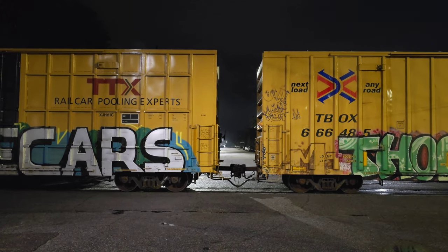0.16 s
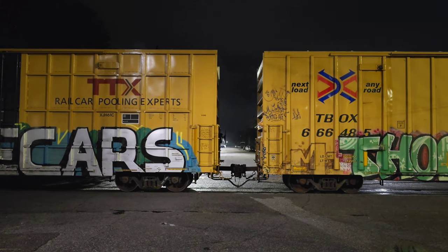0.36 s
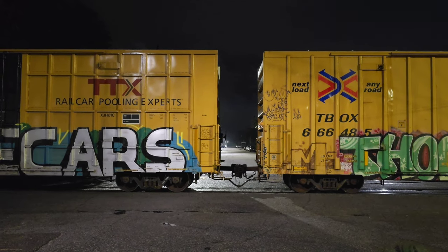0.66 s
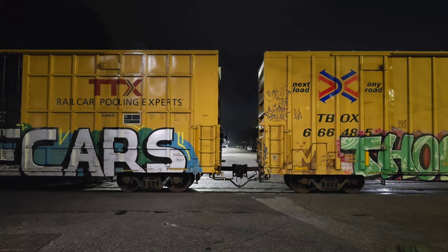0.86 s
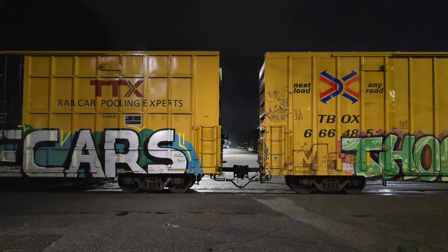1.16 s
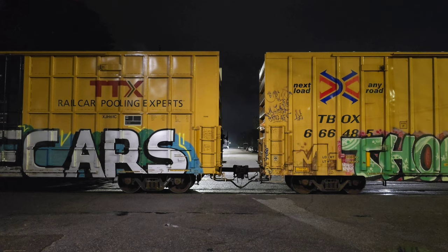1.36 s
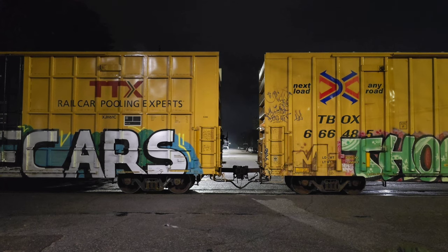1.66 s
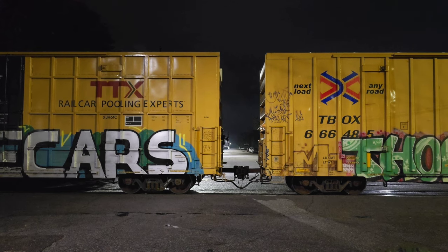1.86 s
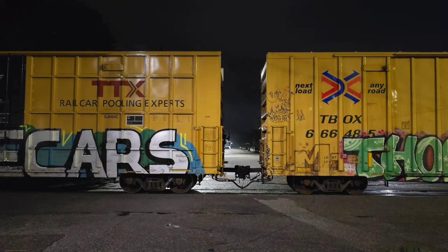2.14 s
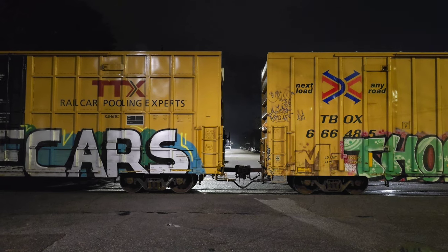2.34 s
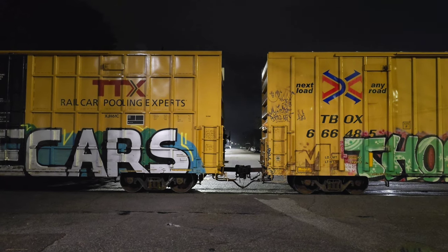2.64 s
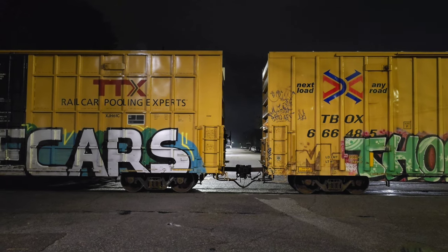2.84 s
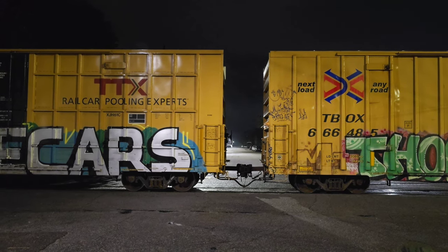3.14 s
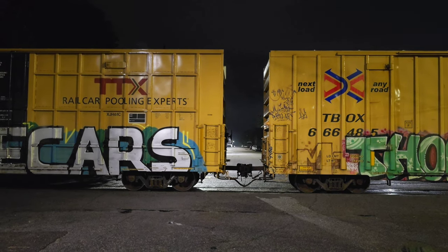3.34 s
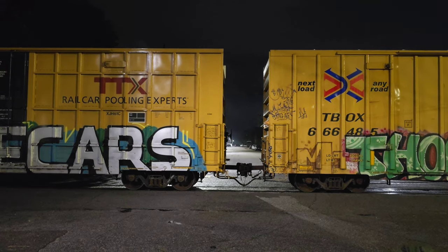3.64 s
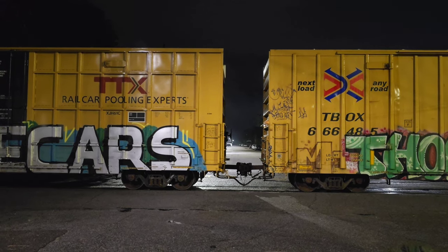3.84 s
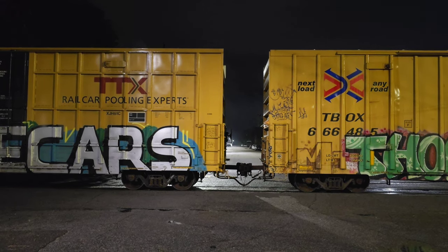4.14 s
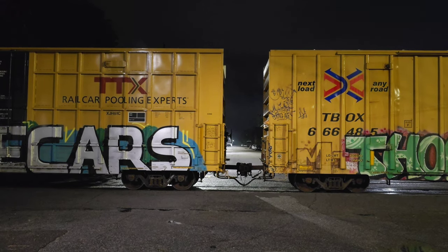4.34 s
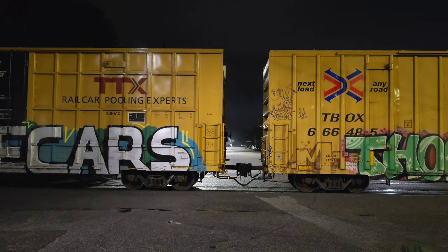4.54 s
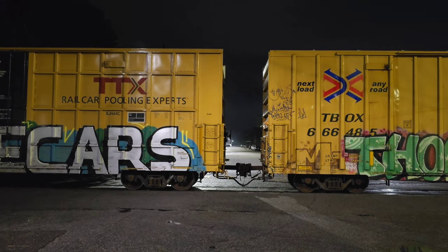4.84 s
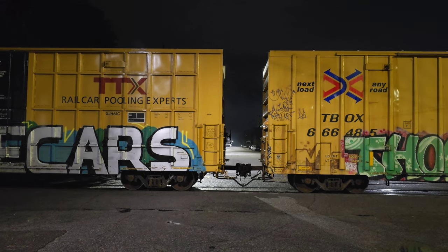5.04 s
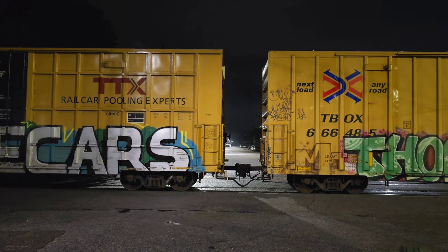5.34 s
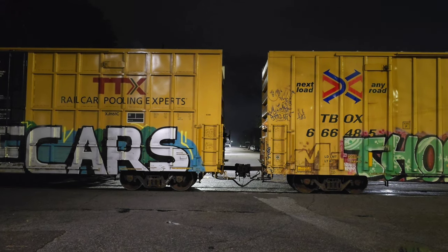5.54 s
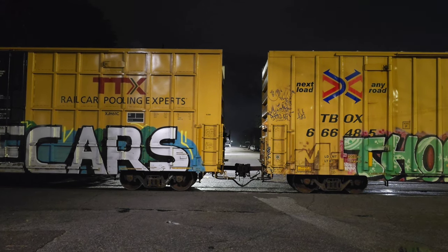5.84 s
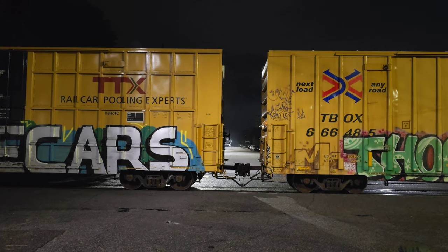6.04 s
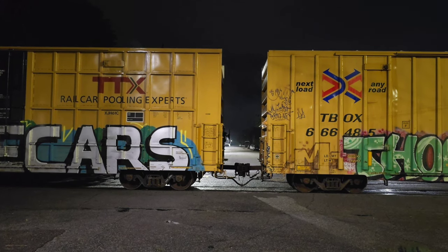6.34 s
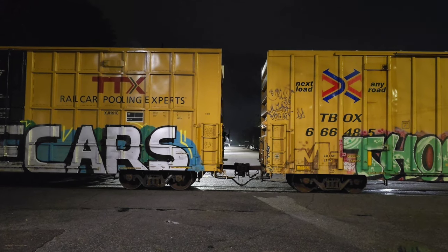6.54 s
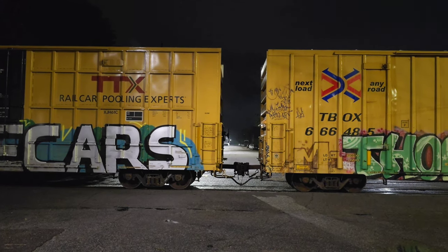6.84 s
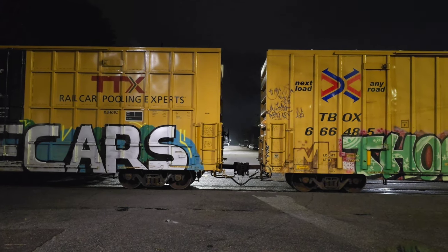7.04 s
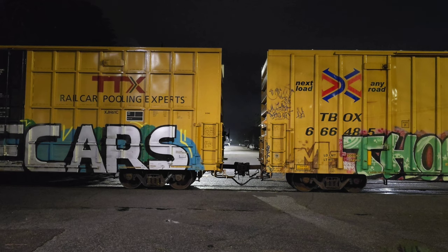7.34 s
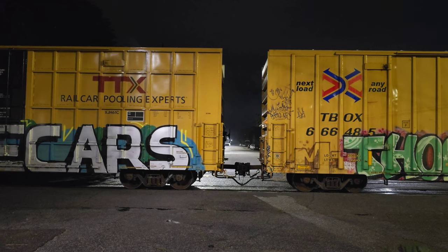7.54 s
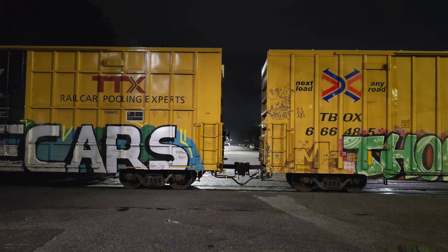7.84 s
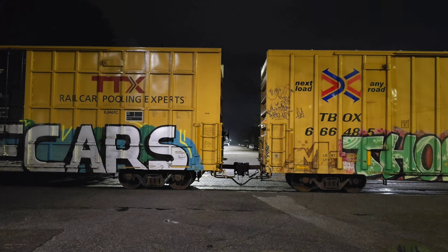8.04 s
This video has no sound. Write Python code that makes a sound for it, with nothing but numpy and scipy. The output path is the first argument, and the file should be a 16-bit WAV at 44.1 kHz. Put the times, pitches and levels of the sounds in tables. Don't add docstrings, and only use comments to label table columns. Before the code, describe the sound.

Sharp metal clank, then deep hollow freight car thuds rolling off into the distance, over engine rumble and air hiss, with brief high brake chirps.

```python
import sys
import numpy as np
from scipy import signal
from scipy.fft import rfft, irfft, next_fast_len
from scipy.io import wavfile
from scipy.ndimage import uniform_filter1d, map_coordinates

SR = 44100
rng = np.random.default_rng(int(sys.argv[2]) if len(sys.argv) > 2 else 0)


def to_linear_factor(level_db):
    exponent = np.asarray(level_db, float) / 20
    return 10 ** exponent


def to_wav(s):
    ch = np.atleast_2d(s).T
    pcm = np.round(np.clip(ch, -1, 1) * 32767)
    wavfile.write(sys.argv[1], SR, pcm.astype(np.int16))


N = 361090
T = np.arange(N) / SR


def unit(x):
    return x / np.sqrt(np.mean(x ** 2) + 1e-20)


def along(points, hz):
    f, v = np.transpose(points)
    return np.interp(np.log(hz + 1), np.log(f + 1), v)


def curve(rows):
    s, value = np.transpose(rows)
    return np.interp(T, s, value)


def wobble(rate, size=N):
    knots = rng.standard_normal(int(size * rate / SR) + 4)
    return map_coordinates(knots, [np.arange(size) * rate / SR])


def filtered(x, response):
    m = next_fast_len(x.shape[-1] + 4096)
    return irfft(rfft(x, m) * response(np.fft.rfftfreq(m, 1 / SR)), m)[..., :x.shape[-1]]


def placed(x, lag):
    # frequency in Hz, level the left loses in dB per sample of lag.
    shadow = [(600, 0), (1500, -.1), (3000, 0.18), (5000, 0.314), (8000, 0.68), (15000, 0.1)]
    port = np.array([[1], [-1]])

    def response(hz):
        loss_db = port * lag * along(shadow, hz) / 2
        return to_linear_factor(-loss_db) * np.exp(-1j * np.pi * port * hz * lag / SR)

    return filtered(x, response)


def diffuse(pair):
    ports_m, sound_m_per_s = 0.22, 343

    def mid_side(hz):
        angle = np.arccos(.97 * np.sinc(2 * hz * ports_m / sound_m_per_s)) / 2
        return np.array([np.cos(angle), np.sin(angle)])

    mid, side = filtered(pair, mid_side)
    return np.array([mid + side, mid - side])


def rush(spectrum, patchy_db, channels=2):
    z = signal.stft(rng.standard_normal((channels, N)), nperseg=512)[2]
    field = uniform_filter1d(rng.standard_normal(z.shape[1:]), size=6, axis=0)
    field = uniform_filter1d(field, size=14, axis=1)
    noise = signal.istft(z * to_linear_factor(patchy_db * unit(field)), nperseg=512)[1][:, :N]
    closed = [(spectrum[0][0] * .7, -120)] + list(spectrum) + [(16500, -120)]
    return unit(filtered(noise, lambda hz: to_linear_factor(along(closed, hz))))


def dying(events, rise_s, fall_db_per_s):
    after = [(np.maximum(T - s, 0), db) for s, db in events]
    return sum(to_linear_factor(db - fall_db_per_s * t) * (1 - np.exp(-t / rise_s)) for t, db in after)


def sung(rows, waver_hz, flutter_db, octave_db):
    s, hz, db = np.transpose(rows)
    span = (T > s[0]) & (T < s[-1])
    t, out = T[span], np.zeros(N)
    pitch_hz = np.interp(t, s, hz) + waver_hz * wobble(117.3, size=len(t))
    phase = 2 * np.pi * np.cumsum(pitch_hz) / SR
    edge = np.clip(np.minimum(t - s[0], s[-1] - t) / 0.0034, 0, 1)
    level = edge * to_linear_factor(np.interp(t, s, db) + 8.0 + flutter_db * wobble(82.7, size=len(t)))
    octave = to_linear_factor(octave_db) * wobble(336, size=len(t)) * np.sin(2 * phase)
    out[span] = level * (np.sin(phase) + octave)
    return out


def blows(table, spread, clear, clear_db, t60_s, rise_s, longest_s):
    clump_hz, clump_db = 110, 2
    out, t = np.zeros((2, N + SR)), np.arange(SR // 2) / SR
    hz, level_db, life_s = np.transpose(clear)[:, :, None]
    decay = to_linear_factor(level_db - 60 * t / np.minimum(life_s, longest_s))
    modes = (decay * np.sin(2 * np.pi * hz * t)).sum(axis=0)
    clumps = clump_db * rng.standard_normal(round(SR / 2 / clump_hz) + 2)

    def crowd_gain(f):
        return to_linear_factor(along(spread, f) + map_coordinates(clumps, [f / clump_hz]))

    for s, db, length_s, lag, tilt_db in table:
        contacts = rng.standard_normal(len(t)) * (rng.random(len(t)) < .05)
        force = contacts * (1 - np.exp(-t / rise_s)) * np.exp(-(t / length_s) ** 2)
        energy = np.abs(signal.fftconvolve(force ** 2, to_linear_factor(-120 * t / t60_s))[:len(t)])
        crowd = np.sqrt(energy) * filtered(rng.standard_normal(len(t)), crowd_gain)
        ring = unit(crowd) + to_linear_factor(clear_db) * unit(signal.fftconvolve(force, modes)[:len(t)])
        ring = filtered(ring, lambda f: to_linear_factor(tilt_db * np.log2(f / 1800 + 0.072)))
        ring = ring / np.sqrt(np.mean(ring[:round(SR * (length_s + .03))] ** 2))
        out[:, round(s * SR):][:, :len(t)] += to_linear_factor(db) * placed(ring, lag)
    return out[:, :N]


def coupler_clank():
    # start in seconds, level in dB, rattle length in seconds, left lag in samples,
    # brightness in dB per octave.
    contacts = [
        (0.0, -42, 0.0075, -27.5, -7),
        (.225, -46, 0.026, -29, -7.5),
        (.318, -45, 0.05, -25, -4),
        (.341, -23, 0.03, -25.5, -1.5),
        (1.0, -46, 0.019, -17.5, -6),
        (.359, -29, 0.0075, -19, -2),
        (.385, -28.5, 0.0087, -23.5, 0),
        (1.345, -46, .04, -26, -14),
    ]
    # frequency in Hz, density in dB per Hz.
    knuckle = [(100, -33), (170, 6.5), (300, -1.5), (500, -5), (900, -3.5), (1400, -2.5), (1800, 1.5),
               (2500, -1), (3500, -4), (5000, -8.5), (7500, -15.5), (10000, -21.5), (12500, -12),
               (14500, -49)]
    # frequency in Hz, level in dB, t60 in seconds.
    steel = [(1616, 0, .2), (1691, -1, .2), (1745, -1, .2), (1979, -3, .2), (2126, -5, .2), (2315, -5, .2),
             (3343, -8, .2), (3700, -11, .2), (4802, -9, .15), (5146, -10, .2), (5812, -5, .2),
             (7607, -6, .2), (8028, -11, .15), (8888, -11, .1), (10870, -17, .1), (11890, -11, .15),
             (12505, -18, .2)]
    return blows(contacts, knuckle, steel, clear_db=-3.5, t60_s=.16, rise_s=.004, longest_s=.18)


def boxcar_blows():
    # start in seconds, level in dB, rattle length in seconds, left lag in samples,
    # brightness in dB per octave.
    hits = [
        (1.055, -40.5, 0.083, 16.5, -0.5),
        (1.112, -28, 0.023, 19, 2.5),
        (1.21, -35, 0.025, 19.6, 1),
    ]
    # frequency in Hz, density in dB per Hz.
    panels = [(60, -37), (110, -3), (230, 6), (320, -22.5), (600, -6), (900, -17.5), (1500, -19.5),
              (2500, -29.5), (4000, -29.5), (6000, -37), (7800, -36), (8800, -46), (14000, -59)]
    # frequency in Hz, level in dB, t60 in seconds.
    bolts = [(113, 0, .3), (610, -15, .09), (830, -14, .1), (3800, -20, .06), (4700, -24, .04),
             (6300, -27, .05), (7400, -28, .05)]
    return blows(hits, panels, bolts, clear_db=-4, t60_s=0.18, rise_s=.005, longest_s=0.63)


def drum(f):
    # frequency in Hz, width in Hz, level in dB.
    cavity = [(112.3, 16, -8), (175, 58, -6.5), (224.6, 32.3, 0), (383, 270, -17), (580, 570, -20)]
    modes = 0
    for k, (hz, width_hz, db) in enumerate(cavity):
        damping = 1j * f * width_hz
        modes = modes + (-1) ** k * to_linear_factor(db) * damping / (hz * hz - f * f + damping)
    return modes / (1 + 1j * f / 600) ** 2


def car_thuds():
    # start in seconds, peak level in dB.
    pushes = [(1.119, -4.5), (1.179, -11), (1.241, -8), (1.304, -17), (1.379, -32), (1.421, -15),
              (1.454, -37), (1.529, -18), (1.637, -16), (1.66, -11), (1.734, -16), (1.788, -39),
              (1.908, -26), (1.952, -35)]
    impulses = np.zeros(N)
    for s, db in pushes:
        impulses[round(s * SR)] = to_linear_factor(db + 36)
    return placed(filtered(impulses, drum), 22)


def singing_wall():
    # start in seconds, length in seconds, level in dB.
    struck = [
        (1.11, 0.15, -30),
        (1.24, 0.064, -29),
    ]
    wall_hz, rise_s, fade_db = 231.2, 0.019, 4.5
    gong = np.zeros(N)
    for s, length_s, db in struck:
        rows = [(s, wall_hz, db - 7), (s + rise_s, wall_hz, db), (s + length_s, wall_hz, db - fade_db)]
        gong = gong + sung(rows, waver_hz=11.5, flutter_db=1.5, octave_db=-16)
    return placed(gong, 22)


def rolling_jolt():
    # start in seconds, level in dB.
    groups = [
        (1.29, -27.5),
        (1.63, -42),
        (1.93, -43.5),
        (2.41, -48.5),
    ]
    pushes = rng.standard_normal((2, N)) * to_linear_factor(wobble(26.18))
    swell = dying(groups, rise_s=0.01, fall_db_per_s=38)
    return swell * diffuse(unit(filtered(pushes, drum)))


def brake_rod():
    # start in seconds, level in dB, rattle length in seconds, left lag in samples,
    # brightness in dB per octave.
    rattles = [
        (1.15, -51, .07, -26, -5.5),
        (1.272, -42, 0.043, -24.5, -4),
        (1.345, -53, 0.016, -29.5, -4),
    ]
    # frequency in Hz, density in dB per Hz.
    hanger = [(250, -13), (450, -0.5), (1000, -3.5), (2400, -8.5), (3200, -0.5), (5300, -4), (7500, -10.5),
              (13000, -21)]
    # frequency in Hz, level in dB, t60 in seconds.
    pins = [(3140, -9, 0.13), (4280, -4, 0.55), (4447, -18, 5.0), (5150, 0, 0.078), (5570, -20, 5.0)]
    return blows(rattles, hanger, pins, clear_db=-9, t60_s=0.08, rise_s=.014, longest_s=.09)


def upper_squeals():
    # start in seconds, length in seconds, first pitch in Hz, last pitch in Hz, level in dB.
    held = [(2.872, .09, 5780, 5470, -54), (2.935, .13, 5680, 5400, -46), (3.855, .135, 5750, 5640, -50),
            (4.0, .19, 5640, 5440, -47), (7.045, .075, 5960, 5840, -54), (7.115, .25, 5800, 5770, -61),
            (7.13, .33, 5845, 5810, -63)]
    # start in seconds, pitch in Hz, level in dB.
    bites = [
        (2.907, 6340, -55),
        (3.885, 6370, -52),
        (6.975, 6370, -60),
        (7.027, 6220, -52),
    ]
    bite_s, bite_fall_hz, grip_s = 0.0426, 520, 0.013
    notes = [(*row, 1.15) for row in held]
    notes += [(s, bite_s, hz, hz - bite_fall_hz, db, 3.1) for s, hz, db in bites]
    u, song = np.linspace(0, 1, num=24), 0
    for s, length_s, first_hz, last_hz, db, settle in notes:
        glide = (np.exp(-settle * u) - np.exp(-settle)) / (1 - np.exp(-settle))
        pitch_hz = last_hz + (first_hz - last_hz) * glide
        level_db = db - 8.5 * np.exp(-u * length_s / grip_s) - 10 * u ** 2
        octave_db = -18 - .1 * abs(pitch_hz.mean() - 5830)
        rows = np.transpose([s + u * length_s, pitch_hz, level_db])
        song = song + sung(rows, waver_hz=15.3, flutter_db=3, octave_db=octave_db)
    return song


def lower_squeals():
    # start in seconds, length in seconds, pitch in Hz, level in dB.
    swells = [
        (2.93, .12, 4550, -71),
        (3.91, .19, 4670, -57),
        (7.045, .26, 4570, -58),
    ]
    swell_db, swell_hz = 14, 50
    u, song = np.linspace(0, 1, num=24), 0
    dip = 1 - np.sin(np.pi * u)
    for s, length_s, hz, db in swells:
        rows = np.transpose([s + u * length_s, hz - swell_hz * dip, db - swell_db * dip])
        song = song + sung(rows, waver_hz=26, flutter_db=0.5, octave_db=-17)
    return song


def brake_squeals():
    rasp = 1 + .15 * wobble(900)
    return to_linear_factor(3) * placed((upper_squeals() + lower_squeals()) * rasp, 12)


def yard_echoes(x):
    # frequency in Hz, t60 in seconds.
    decay = [(100, 1), (500, 0.8), (1800, 0.51), (3200, 0.87), (6000, 0.73), (12000, 0.22)]
    hz, t, z = signal.stft(rng.standard_normal((2, SR)), SR, nperseg=256)
    tail = signal.istft(z * to_linear_factor(-60 * t / along(decay, hz)[:, None]), SR, nperseg=256)[1]
    tail = diffuse(tail) * np.clip(np.arange(tail.shape[1]) / (SR * 0.0096), 0, 1)
    return signal.fftconvolve(x, tail / np.linalg.norm(tail[0]), axes=1)[:, :N]


def ticks():
    # start in seconds, peak level in dB.
    snaps = [
        (2.261, -41.5),
        (2.733, -58),
    ]
    out, t = np.zeros(N), np.arange(SR // 20) / SR
    for s, db in snaps:
        out[round(s * SR):][:len(t)] += to_linear_factor(db - 60 * t / 0.045) * rng.standard_normal(len(t))
    return placed(filtered(out, lambda hz: (hz / 5000) ** 2 / (1 + (hz / 5000) ** 2)), -7)


def far_slack():
    # centre in seconds, spread in seconds, level in dB.
    runs = [
        (1.8, 0.36, -57),
        (3.4, 0.49, -61),
    ]
    # frequency in Hz, density in dB per Hz.
    clatter = [(600, -20), (1100, 1), (1700, -8), (3000, -9.5), (5000, -6), (8000, -30)]
    swell = sum(to_linear_factor(db) * np.exp(-((T - s) / lasts_s) ** 2) for s, lasts_s, db in runs)
    return swell * to_linear_factor(2.4 * wobble(27)) * diffuse(rush(clatter, patchy_db=2))


def gear_shake():
    # start in seconds, level in dB.
    shakes = [
        (.42, 6.5),
        (1.24, -8),
    ]
    return dying(shakes, rise_s=0.02, fall_db_per_s=60 / 2.75)


def air_leak():
    # frequency in Hz, density in dB per Hz.
    hiss = [(800, -5.5), (1300, -5.5), (2000, -21.5), (2700, -10), (3300, -5.5), (4000, 1), (5000, 1.5),
            (6000, 0.5), (6800, -6.5), (7400, -4.5), (8200, -2.5), (9500, -6.5), (11000, -22.5),
            (12500, -32), (15000, -53)]
    direct, *scattered = rush(hiss, patchy_db=1.18, channels=3)
    level = np.hypot(to_linear_factor(-54), to_linear_factor(-54) * gear_shake())
    return level * placed(0.51 * direct + 0.46 * np.array(scattered), 12.64)


def thin_leak():
    # time in seconds, level in dB.
    pressure = [(0.0, -76), (0.34, -77), (0.5, -67), (0.93, -80.5), (1.41, -75), (1.6, -81), (1.85, -73),
                (1.98, -73), (2.23, -76), (2.57, -81), (3.51, -77.5), (3.6, -79.5), (5.36, -81),
                (5.52, -79.5), (6.98, -82.5), (7.16, -80), (7.98, -84), (8.19, -83)]
    # frequency in Hz, density in dB per Hz.
    hiss = [(7500, -38), (9500, -21), (11000, -7), (11800, 10), (13000, 6.5), (14900, 5), (15200, -20)]
    return to_linear_factor(curve(pressure) + 7.0) * rush(hiss, patchy_db=.8)


def engines():
    # time in seconds, level in dB.
    strength = [(0.0, -41), (1.03, -42.5), (1.16, -40), (1.3, -34), (1.82, -40.5), (2.42, -45), (3.92, -44),
                (4.86, -44.5), (5.27, -43), (5.66, -45), (6.07, -43), (6.86, -47), (7.64, -44), (8.19, -45.5)]
    # frequency in Hz, density in dB per Hz.
    rumble = [(12, -54), (20, -14.5), (81, -1), (108, -11), (173, -9.5), (206, -14), (232, -10),
              (269, -21.5), (352, -25.5), (500, -31), (650, -48), (1100, -120)]
    level_db = curve(strength) + 2 + 0.33 * wobble(3.93)
    return to_linear_factor(level_db) * diffuse(rush(rumble, patchy_db=0.5))


def traffic():
    # frequency in Hz, density in dB per Hz.
    murmur = [(250, 5.5), (400, -1), (700, 3), (850, -9), (1300, -7.5), (1750, -7.5), (2100, -2),
              (2600, -17.5), (3500, -25.5)]
    busy = to_linear_factor(-59.5 + 5 * np.exp(-T / 1.16))
    return np.hypot(busy, to_linear_factor(-48) * gear_shake()) * diffuse(rush(murmur, patchy_db=0.54))


def passing_car():
    # frequency in Hz, density in dB per Hz.
    tyres = [(300, -8), (600, 7.5), (1000, 0.5), (1300, -7), (2000, -35)]
    swell = to_linear_factor(-56.0) * np.exp(-((T - 4.52) / 0.41) ** 2)
    return swell * diffuse(rush(tyres, patchy_db=-0.5))


def narrow(hz, width_hz):
    b, a = signal.iirpeak(hz, hz / width_hz, SR)
    return unit(signal.lfilter(b, a, rng.standard_normal((2, N))))


def insects():
    # frequency in Hz, width in Hz, level in dB, fade in seconds.
    whines = [(3696, 36, -59.5, 1.0), (6070, 60, -64.5, 0.76), (2940, 250, -61, 1.0)]
    pulses = np.clip(np.sin(2 * np.pi * np.cumsum(52 + wobble(3)) / SR) + .3, 0, 1)
    song = to_linear_factor(-67 + wobble(2)) * pulses * placed(narrow(7390, 180), 12)
    for hz, width_hz, db, fade_s in whines:
        song = song + to_linear_factor(db) * np.exp(-(T / fade_s) ** 2) * narrow(hz, width_hz)
    return song


def scene():
    left = coupler_clank() + brake_rod()
    boxcar = boxcar_blows()
    brakes = brake_squeals()
    echoes = yard_echoes(to_linear_factor(-6.5) * left + to_linear_factor(-7.5) * boxcar + to_linear_factor(-14) * brakes)
    train = left + boxcar + car_thuds() + singing_wall() + rolling_jolt() + brakes + echoes
    night = air_leak() + thin_leak() + engines() + traffic() + passing_car() + insects()
    return train + ticks() + far_slack() + night


def top_cut(x):
    return signal.sosfilt(signal.butter(12, 15670, fs=SR, output="sos"), x)


def record(dry):
    # frequency in Hz, gain in dB.
    right_port = [(100, -0.5), (2000, 0.5), (7600, 1), (8400, -23), (11000, -2.5), (15000, -4.5)]
    top_hz = 15650
    ports = filtered(dry, lambda hz: (hz < top_hz) * to_linear_factor([0 * hz, along(right_port, hz)]))
    return top_cut(ports)


dry = scene()
out = record(dry)
to_wav(out)
```